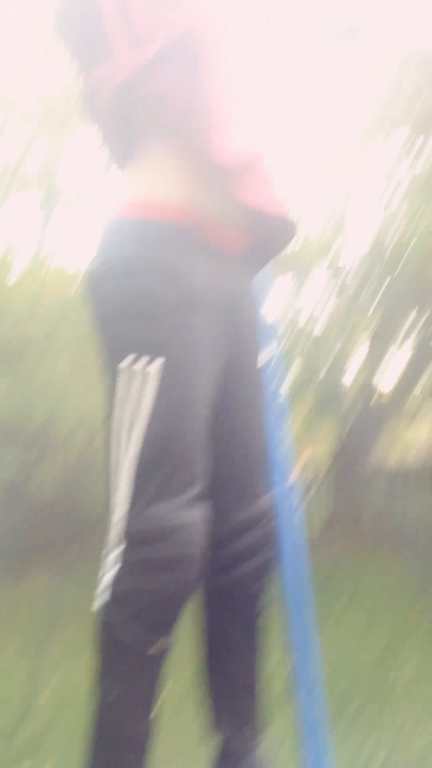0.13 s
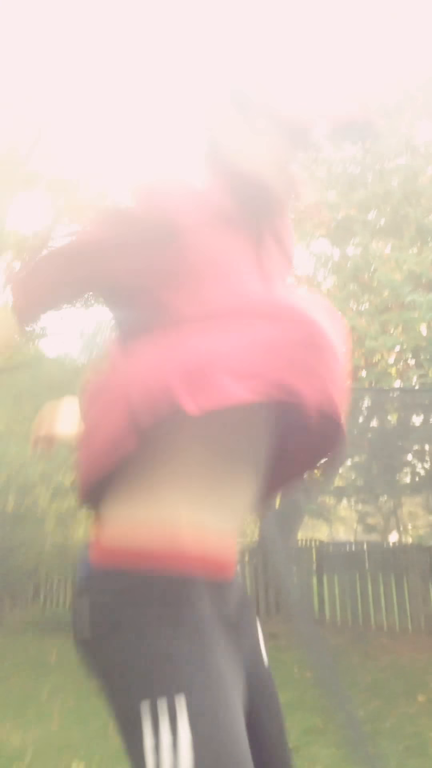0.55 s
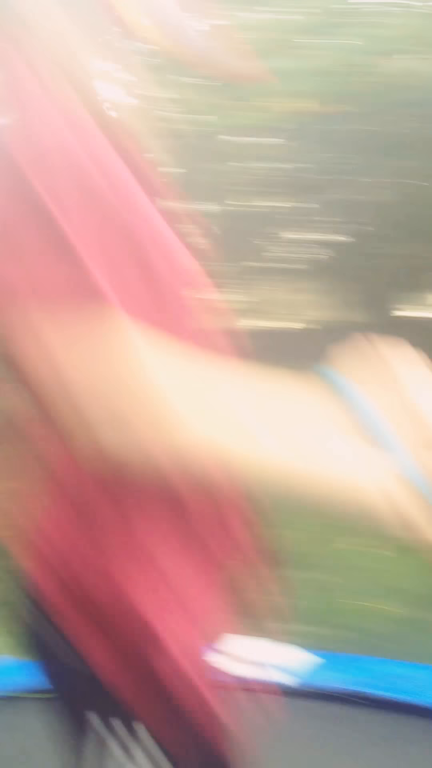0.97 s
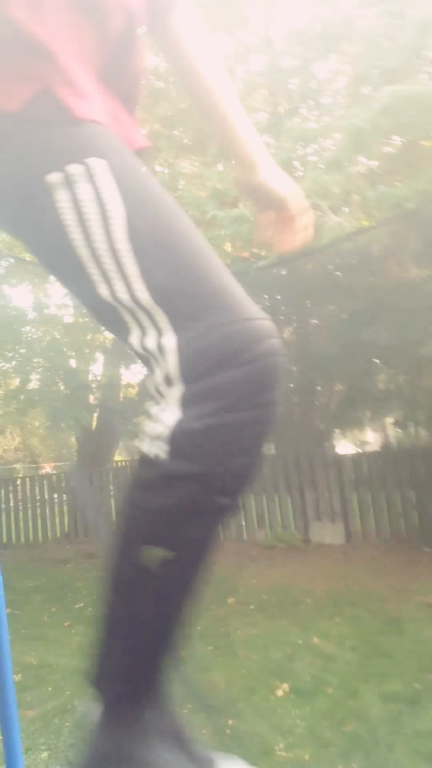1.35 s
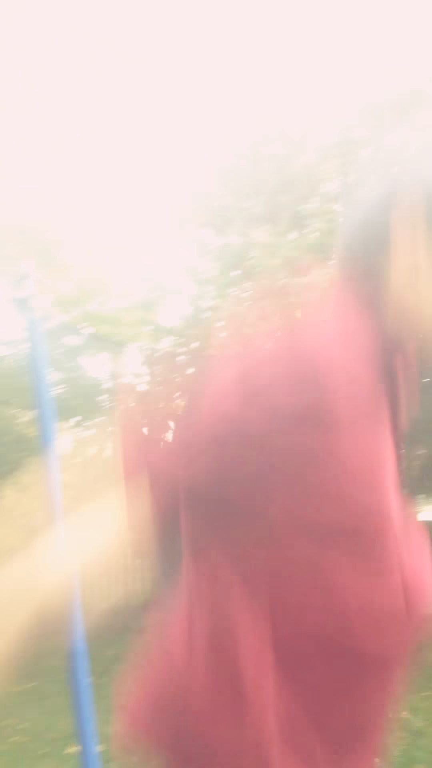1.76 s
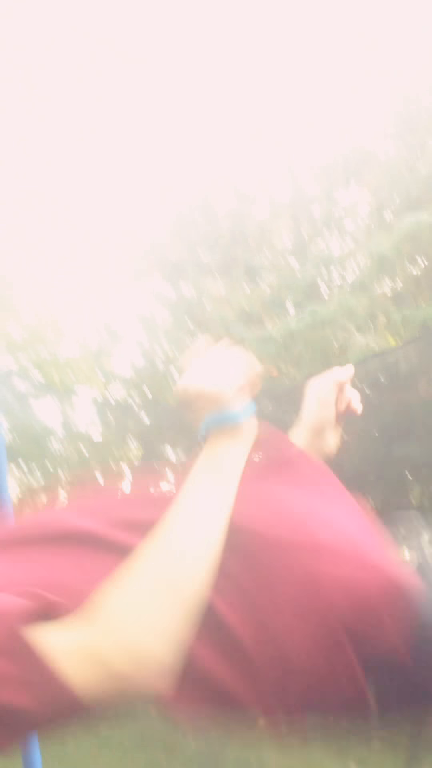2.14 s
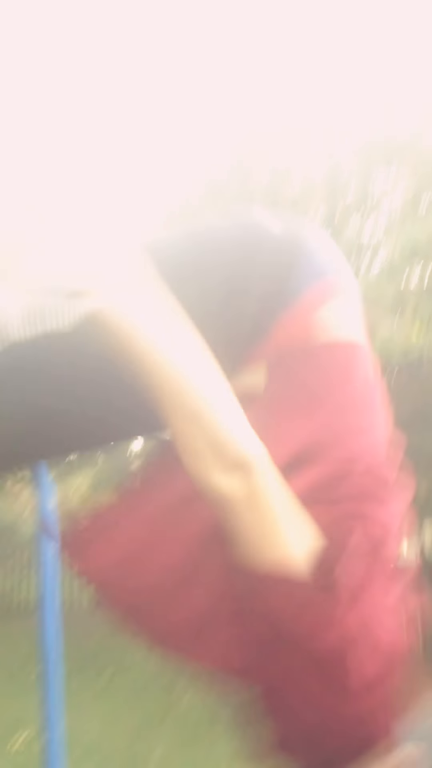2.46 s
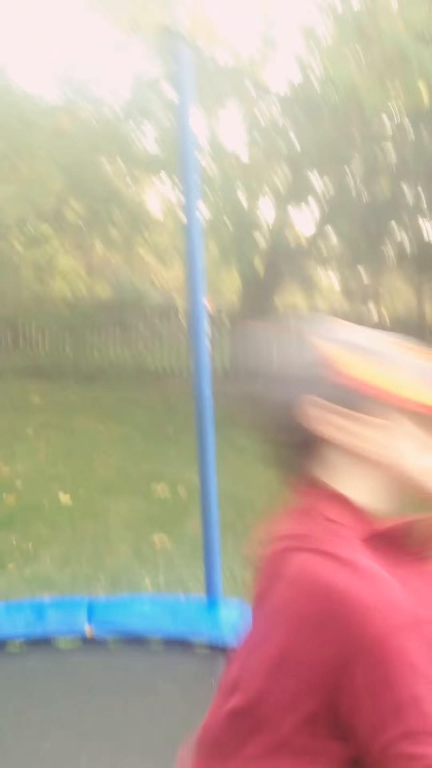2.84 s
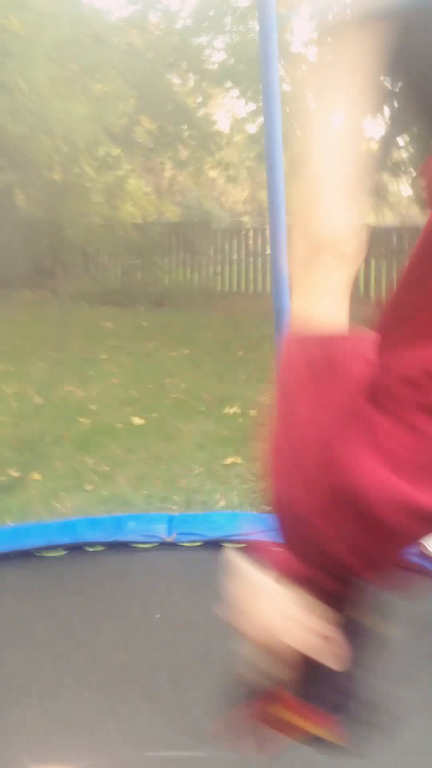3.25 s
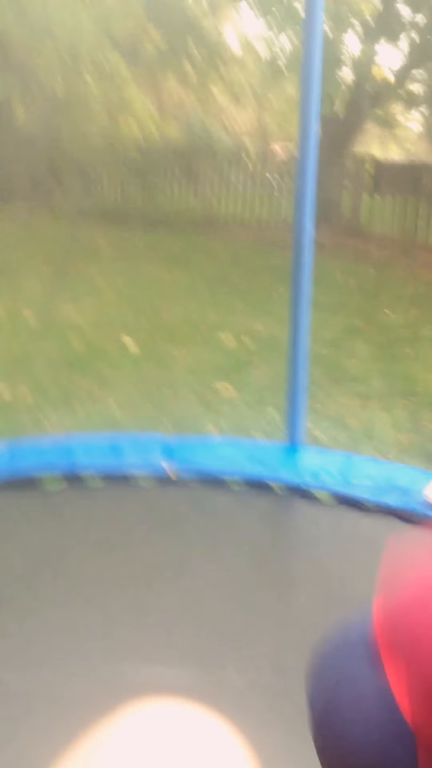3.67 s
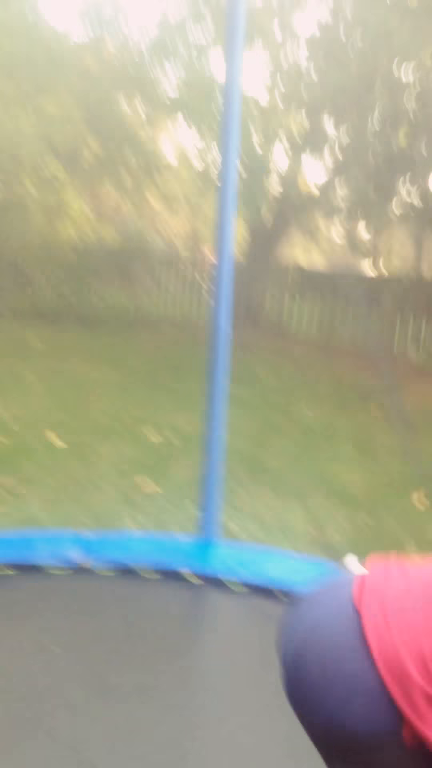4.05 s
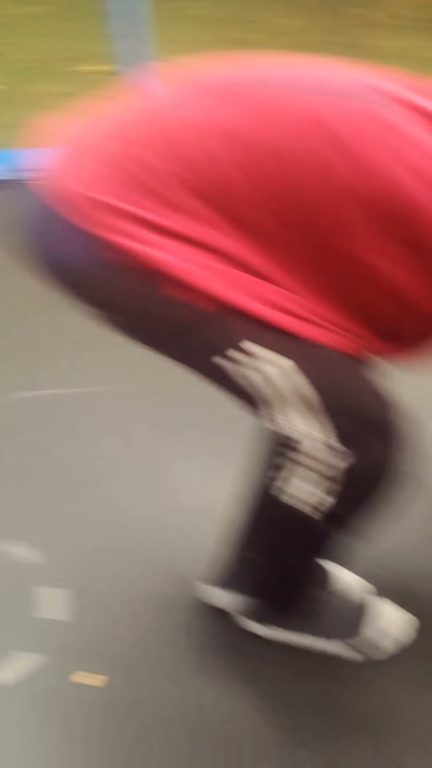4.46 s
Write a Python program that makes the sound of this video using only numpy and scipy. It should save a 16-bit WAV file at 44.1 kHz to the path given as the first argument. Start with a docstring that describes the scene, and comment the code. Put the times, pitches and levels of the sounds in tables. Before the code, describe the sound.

Children bounce on a trampoline in a quiet garden, heard close from the mat. About once a second the steel springs rasp and jangle, their hooks snapping and the coils ringing briefly as feet thud on the taut fabric. Lighter rattles follow each of the four bounces. A small loose piece of metal tinkles in between, with a few dry taps on the net and poles and a soft outdoor hush behind.

```python
"""Steel trampoline springs rasp as children bounce, heard from the mat. Their hooks stick and slip in the
frame: loud as the mat sinks, softer as it rebounds. Hooks snap, coils ring on, and feet thud on the
taut fabric. A small loose piece of metal tinkles close by, with a few dry taps on the net and poles.
Behind it lies the quiet hush of a garden."""
import sys
import numpy as np
from scipy import signal
from scipy.fft import rfft, irfft
from scipy.io import wavfile

SR = 44100
rng = np.random.default_rng(int(sys.argv[2]) if len(sys.argv) > 2 else 0)


def master(y):
    """Save y as 16-bit WAV."""
    cut = np.clip(np.atleast_2d(y).T, -1, 1)
    pcm = np.round(cut * 32767)  # scale
    wavfile.write(sys.argv[1], SR, pcm.astype(np.int16))


N = 203054
TIME_S = np.arange(N) / SR
RING_S = TIME_S[:2 * SR // 3]

# Spectral shapes of the sources. Each row: frequency in Hz, relative gain in dB.
GARDEN_SPECTRUM = [(26, -27), (45, -7), (195, 3.5), (322, 1), (485, 1), (602, 0), (823, -1.5), (1070, -2),
                   (1430, -4), (2150, -6), (5230, -41), (8250, -44), (9310, -47), (10000, -50),
                   (14000, -29)]
TAP_SPECTRUM = [(300, -27), (800, -12.5), (1250, 4), (2200, -10), (3200, 2.5), (4300, -19.5), (9000, -21),
                (16000, -40)]
TICK_SPECTRUM = [(800, -1.5), (3000, 0), (4100, 10), (6500, 1.5), (9300, 3.5), (11000, -13), (14000, -7),
                 (16000, 15)]
MAT_SPECTRUM = [(25, -35), (50, -25), (80, -7.5), (120, 5), (175, 5.5), (260, -1), (380, -4.5), (600, -7.5),
                (1500, -48.5)]
SLAP_SPECTRUM = [(60, -7), (150, -12), (400, -8), (800, -14), (1500, -20.5), (4000, -43), (10000, -69)]
FRAME_SPECTRUM = [(30, -60), (80, -21), (150, -4), (400, -2.5), (750, -5.5), (1200, -1.5), (1900, 3),
                  (2700, 1.5), (4000, -14), (9000, -22)]
HOOK_SPECTRUM = [(300, -59), (1000, -19), (2000, -13), (3200, -6.5), (4100, -1), (5100, 1), (6200, -5),
                 (8000, -15), (9500, -21), (10800, -38), (12800, -25.5), (16000, -37)]
# Taps on the net and poles. Each row: start in seconds, relative peak in dB.
POLE_TAPS = [(0.331, -23.5), (1.1772, -31), (2.52, -35), (4.3626, -31), (4.426, -39.5)]
# Clear strikes of the loose piece. Each row: start in seconds, relative level in dB,
# offset of the middle modes in dB, offset of the contact tick in dB.
PIECE_STRIKES = [(0.1273, -27, -5, -14), (0.2674, -36, -7, 9.5), (0.35, -37, -7, 2),
                 (0.5868, -46, -18, 10.5), (1.0774, -40, 0, 16), (1.2261, -36, -1.5, -6),
                 (1.4669, -37, -12, 6.5), (2.0857, -30, -2, -14), (2.2024, -40, 1, 0),
                 (2.3736, -40, 7, 5.5), (2.3974, -34.5, 0, 7), (2.4118, -46, -15, 11),
                 (2.4634, -53.5, 15, 11), (2.592, -32.5, -15, 2), (2.706, -40.5, -9, 13.5),
                 (3.007, -16.5, -12, -14), (3.1941, -40.5, 14, 10), (4.143, -34, 4, 6.5)]
# Modes of the loose piece. Each row: frequency in Hz, relative level in dB, t60 in seconds.
PIECE_MIDDLE_MODES = [(4070, 2.5, 0.05), (9880, -4, 0.13), (10000, 0, 0.052)]
PIECE_TOP_MODES = [(11700, -26, .08), (14990, -7, .05), (15100, 0, .075)]
# Feet and bodies meeting the mat. Each row: start in seconds, relative peak in dB, slap offset in dB,
# flutter t60 in seconds, boom frequency in Hz, boom offset in dB.
MAT_FOOTFALLS = [(0.608, -37.5, -10, 0.035, 410, 0), (0.746, -29, -19.5, 0.14, 250, -8),
                 (1.842, -29, -15, 0.25, 179, 0), (2.793, -20.5, -31, 0.04, 184.5, -6.5),
                 (3.592, -17.5, -9, 0.044, 167, -6), (3.767, -23.5, -13, 0.13, 139, -14)]
# Lasting tones of the coils and tubes. Each row: frequency in Hz, relative level in dB.
COIL_TONES = [(1610, 7), (1868, 0), (2634, -7), (3284, 4), (3521, -6), (3786, -4), (4048, -4), (4377, -11),
              (4927, -4), (5067, -10), (5186, 8), (5491, 10), (5648, 4), (5787, -10), (6546, -15)]
# Hooks jumping in their holes. Each row: start in seconds, relative peak in dB, t60 in seconds.
HOOK_SNAPS = [(0.056, -14, 0.11), (0.187, -15.5, 0.15), (0.3642, -29, 0.05), (0.797, -9.5, 0.12),
              (0.8778, -0.5, 0.075), (1.3501, -19, 0.13), (1.8755, -12.5, 0.089), (2.056, -12.5, 0.088),
              (2.2526, -21, 0.15), (2.5668, -31.5, 0.099), (2.59, -24, 0.066), (2.7706, -22.5, 0.061),
              (2.846, -7.5, 0.1), (2.9119, -2, 0.07), (3.6926, -4, 0.1), (4.351, -17, 0.11),
              (4.565, -23.5, 0.06)]
# Further scrapes of the springs between the bounces: the mat still swinging back from an earlier bounce at the
# start, settling after a bounce, or a child shifting weight. Each row: start in seconds, hold in seconds,
# relative rasp in dB.
SPRING_SCRAPES = [(0.0, 0.08, -31), (0.131, 0.017, -33), (0.42, 0.08, -53.5), (1.106, 0.03, -36.5),
                  (1.225, 0.04, -40.5), (1.56, 0.02, -54), (1.715, 0.04, -56.5), (2.147, 0.025, -31.5),
                  (2.254, 0.05, -37.5), (2.691, 0.12, -48), (3.178, 0.046, -35.5), (3.345, 0.18, -34.5),
                  (3.901, 0.2, -32), (4.263, 0.14, -39.5), (4.494, 0.12, -46.5)]
# Bounces that stretch the springs. Each row: rasp centre in seconds, relative rasp in dB, half width in
# seconds, frame offset in dB, half widths of rebound and of settling in seconds, delay of the knock at
# full stretch in seconds, relative knock peak in dB.
MAT_BOUNCES = [(0.857, -17.5, 0.063, -10.5, 0.067, 0.25, 0.021, -24.5),
               (1.945, -19, 0.054, -10, 0.079, 0.13, 0.033, -28.5),
               (2.892, -14.5, 0.05, -12, 0.071, 0.23, 0.022, -23),
               (3.685, -18.5, 0.046, -11, 0.06, 0.12, 0.008, -22.5)]


def undb(db):
    """Decibels to gain."""
    return 10 ** (np.asarray(db) / 20)


def level(x, db):
    """Scale to an rms level."""
    return x * undb(db) / np.sqrt(np.mean(x ** 2))


def peak(x, db):
    """Scale to a peak level."""
    return x * undb(db) / np.abs(x).max()


def unit(x):
    """Scale to unit energy."""
    return x / np.sqrt(np.sum(x ** 2))


def fade(t60_s):
    """Exponential decay."""
    return np.exp(-np.log(1000) * RING_S / t60_s)


def burst(t60_s):
    """Decaying noise: dense modes dying together."""
    return rng.standard_normal(len(RING_S)) * fade(t60_s)


def mode(hz, t60_s):
    """Decaying sine, random phase."""
    return np.sin(2 * np.pi * (hz * RING_S + rng.random())) * fade(t60_s)


def convolve(x, response):
    """Convolve, keeping the input length."""
    return signal.fftconvolve(x, response)[:len(x)]


def colour(x, spectrum, size=4096):
    """Minimum-phase filter of unit energy through (Hz, dB) points."""
    hz, db = np.transpose(spectrum)
    bin_hz = np.fft.rfftfreq(size, 1 / SR)
    bin_db = np.interp(np.log(bin_hz + 1), np.log(hz), db)
    cepstrum = irfft(np.log(undb(bin_db)))[:size // 2]
    cepstrum[1:] *= 2
    response = irfft(np.exp(rfft(cepstrum, size)))
    return convolve(x, unit(response))


def walk(rate_hz):
    """Random drift with a spread near 1."""
    knots = rng.standard_normal(2048)
    return np.interp(TIME_S * rate_hz, np.arange(len(knots)), knots)


def add(track, start_s, sound):
    """Mix a sound in at a time."""
    start = int(start_s * SR)
    track[start:start + len(sound)] += sound[:N - start]


def garden(rms_db=-52.5, waver_db=1.8):
    """Leaves and far-off traffic: a soft, wavering hush."""
    hush = colour(rng.standard_normal(N), GARDEN_SPECTRUM)
    return level(hush * undb(waver_db * walk(rate_hz=6.59)), rms_db)


def yard_echo(x, wet_db=-26, t60_s=0.33, build_s=0.086):
    """Fence and trees scatter a little sound back, late."""
    response = burst(t60_s) * np.minimum(RING_S / build_s, 1)
    return undb(wet_db) * convolve(x, unit(response))


def taps(gain_db=2.0, t60_s=0.018):
    """Short, hollow knocks on the net and poles."""
    out = np.zeros(N)
    for start_s, db in POLE_TAPS:
        add(out, start_s, peak(colour(burst(t60_s), TAP_SPECTRUM), db + gain_db))
    return out


def jiggles(motion, count=22, spread_db=6):
    """Faint touches of the loose piece, likelier as the mat moves. Rows as in PIECE_STRIKES."""
    odds = np.cumsum(np.minimum(motion, np.quantile(motion, 0.6)))
    starts_s = np.interp(rng.random(count), odds / odds[-1], TIME_S)
    levels_db = [-45, -10, -4] + spread_db * rng.standard_normal((count, 3))
    return [(start_s, *row) for start_s, row in zip(starts_s, levels_db)]


def tinkles(touches, ring_db=-4.5, tick_db=12.5, chatter_db=-4, detune=0.0011):
    """Each touch ticks, chatters and rings the loose piece; where it is hit sets the mix of modes."""
    out = np.zeros(N)
    for start_s, db, middle_db, contact_db in touches:
        ring = 0
        for modes, offset_db in ((PIECE_TOP_MODES, 0), (PIECE_MIDDLE_MODES, middle_db)):
            for hz, mode_db, t60_s in modes:
                detuned_hz = hz * (1 + detune * rng.standard_normal())
                ring += undb(mode_db + offset_db) * mode(detuned_hz, t60_s)
        contact = undb(chatter_db) * unit(burst(t60_s=0.069))
        contact[0] += 1
        tinkle = np.linalg.norm(ring) * unit(convolve(ring, contact))
        add(out, start_s, undb(db + ring_db) * tinkle)
        tick = colour(burst(t60_s=0.03), TICK_SPECTRUM)
        add(out, start_s, peak(tick, db + contact_db + tick_db))
    return out


def frame_knocks(slap_offset_db=-3, t60_s=0.25, boom_hz=173.4, boom_offset_db=-11):
    """The frame knocks at each full stretch. Rows as in MAT_FOOTFALLS."""
    return [(centre_s + delay_s, db, slap_offset_db, t60_s, boom_hz, boom_offset_db)
            for centre_s, *_, delay_s, db in MAT_BOUNCES]


def mat(blows, flutter_db=4, thud_db=-1.0, slap_db=5.5, boom_cycles=20):
    """A blow pushes the taut fabric, which flutters and booms on; the contact itself slaps."""
    out = np.zeros(N)
    for start_s, db, slap_offset_db, t60_s, boom_hz, boom_offset_db in blows:
        push = undb(flutter_db) * unit(burst(t60_s))
        push[0] -= 1
        add(out, start_s, peak(colour(push, MAT_SPECTRUM), db + thud_db))
        boom = mode(boom_hz, boom_cycles / boom_hz) * (1 - fade(t60_s=0.0047))
        add(out, start_s, peak(boom, db + boom_offset_db))
        slap = colour(burst(t60_s=0.055), SLAP_SPECTRUM)
        add(out, start_s, peak(slap, db + slap_offset_db + slap_db))
    return out


def coils(shake, ring_db=-27, t60_cycles=1700, max_t60_s=0.9):
    """Shaken coils and tubes ring on, the low tones longest."""
    response = sum(undb(db) * mode(hz, min(t60_cycles / hz, max_t60_s)) for hz, db in COIL_TONES)
    return undb(ring_db) * convolve(shake, unit(response))


def snaps(gain_db=-5.5):
    """A hook jumps and its coil chatters briefly."""
    out = np.zeros(N)
    for start_s, db, t60_s in HOOK_SNAPS:
        add(out, start_s, peak(colour(burst(t60_s), HOOK_SPECTRUM), db + gain_db))
    return out


def swell(centre_s, half_s):
    """Power of one swing of the mat: a bell, 10 dB down at half_s from its centre."""
    return 10 ** -(((TIME_S - centre_s) / half_s) ** 2)


def strain(rebound_delay_s=0.15, rebound_db=-7, settling_db=-17.5, scrape_frame_db=-8.5):
    """Rasp and frame gains: bounces sink, rebound and settle; further scrapes rise, hold and die away."""
    attack_s, release_s = 0.011, 0.019
    rasp_power, frame_power = undb(-59) ** 2, undb(-67) ** 2  # the springs never quite rest
    for centre_s, db, half_s, frame_db, rebound_half_s, settling_half_s, _, _ in MAT_BOUNCES:
        rebound_s = centre_s + rebound_delay_s
        rebound = undb(rebound_db) ** 2 * swell(rebound_s, rebound_half_s)
        settling = undb(settling_db) ** 2 * swell(rebound_s, settling_half_s) * (TIME_S > rebound_s)
        power = undb(db) ** 2 * (swell(centre_s, half_s) + rebound + settling)
        rasp_power += power
        frame_power += power * undb(frame_db) ** 2
    for start_s, hold_s, db in SPRING_SCRAPES:
        before_s = np.maximum(start_s - TIME_S, 0)
        after_s = np.maximum(TIME_S - start_s - hold_s, 0)
        power = undb(db) ** 2 * np.exp(-before_s / attack_s - after_s / release_s)
        rasp_power += power
        frame_power += power * undb(scrape_frame_db) ** 2
    return np.sqrt(rasp_power), np.sqrt(frame_power)


def pings(gain, low_hz, high_hz, t60_s, count, attack_s=0.0005):
    """Turns of wire collide at random and ring briefly, each at its own pitch."""
    out, age_s = np.zeros(N), RING_S[:SR // 8]
    envelope = np.exp(-np.log(1000) * age_s / t60_s) * (1 - np.exp(-age_s / attack_s))
    for position, pitch, size in rng.random((count, 3)):
        hz = low_hz * (high_hz / low_hz) ** pitch
        ping = size * envelope * np.sin(2 * np.pi * hz * age_s)
        add(out, position * N / SR, gain[int(position * N)] * ping)
    return np.linalg.norm(gain) * unit(out)


def hook_slips(median_hz=74.9, scatter_db=1.0, grip_db=7):
    """One hook sticks and slips at a wandering rate, now biting, now gliding."""
    rate_hz = median_hz * np.exp(0.5 * walk(rate_hz=25))
    cycles = np.cumsum(rate_hz) / SR + rng.random()
    slip_at = np.flatnonzero(np.diff(np.floor(cycles)))
    polarity, scatter = rng.standard_normal((4096, 2))[:len(slip_at)].T
    grip = walk(rate_hz=20)[slip_at]
    slips = np.zeros(N)
    slips[slip_at] = np.sign(polarity) * undb(scatter_db * np.tanh(scatter) + grip_db * np.tanh(grip))
    return level(slips, 0)


def spring_response(clatter_db=6.0, tone_db=-7.5, tone_range_hz=(3000, 8000)):
    """One slip gives a crack, a short clatter along the coil and six tones of that spring's own."""
    tones = sum(mode(hz, t60_s=0.12) for hz in rng.uniform(*tone_range_hz, 6))
    response = undb(clatter_db) * unit(burst(t60_s=0.038)) + undb(tone_db) * unit(tones)
    response[0] += 1
    return unit(response)


def springs(rasp_gain, frame_gain, light_spurt_db=4.0, heavy_spurt_db=1.0, count=20):
    """Many hooks rasp at once; each shakes its own stretch of frame tube, which clanks lower."""
    hooks, tubes = np.zeros(N), np.zeros(N)
    for _ in range(count):
        slips = hook_slips()
        hooks += convolve(slips, spring_response())
        tubes += convolve(slips, unit(burst(t60_s=0.026)))
    # Under light load few springs move, so the rattle comes in uneven spurts.
    load_db = 20 * np.log10(rasp_gain)
    spurt_db = np.interp(load_db, [-42, -22], [light_spurt_db, heavy_spurt_db])
    spurts = undb(spurt_db * walk(rate_hz=55))
    hook_gain, tube_gain = rasp_gain * spurts, frame_gain * spurts
    hook_pings = pings(hook_gain, low_hz=2004, high_hz=10000, t60_s=0.074, count=2600)
    tube_pings = pings(tube_gain, low_hz=793.6, high_hz=3287, t60_s=0.08, count=800)
    rasp = level(hooks, -1.44) * hook_gain + undb(-10.5) * hook_pings
    clank = level(tubes, -1.68) * tube_gain + undb(-14.5) * tube_pings
    return colour(rasp, HOOK_SPECTRUM) + colour(clank, FRAME_SPECTRUM)


def scene():
    """Springs, mat and loose piece close by, in the open air. Mono."""
    rasp_gain, frame_gain = strain()
    steel = springs(rasp_gain, frame_gain) + snaps() + taps()
    near = steel + coils(steel)
    near += mat(MAT_FOOTFALLS + frame_knocks())
    near += tinkles(PIECE_STRIKES + jiggles(rasp_gain))
    return (near + yard_echo(near) + garden())[None]


def record(dry):
    """The small microphone loses the deep bass; the phone cuts the top."""
    low_hz, top_hz = 68, 15600
    highpass = signal.butter(4, low_hz, "highpass", fs=SR, output="sos")
    lowpass = signal.ellip(10, 0.2, 80, top_hz, fs=SR, output="sos")
    return signal.sosfilt(lowpass, signal.sosfilt(highpass, dry))


dry = scene()
out = record(dry)
master(out)
```